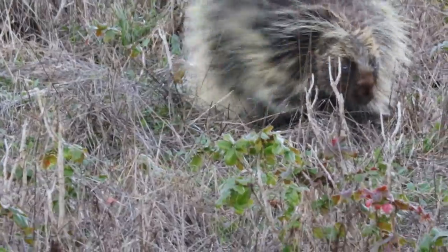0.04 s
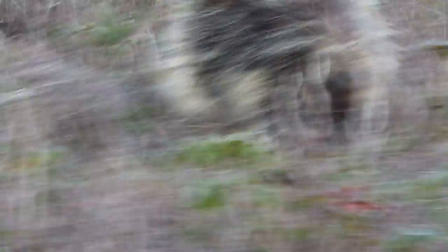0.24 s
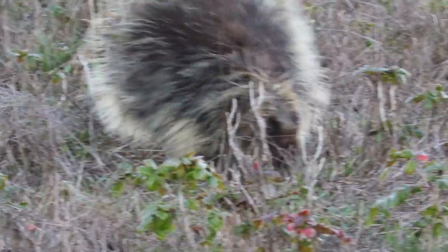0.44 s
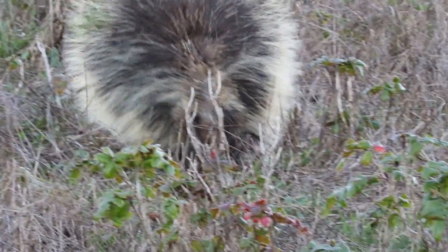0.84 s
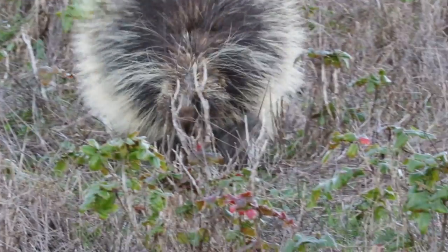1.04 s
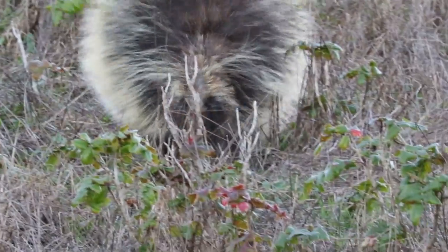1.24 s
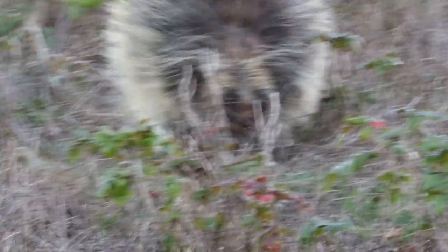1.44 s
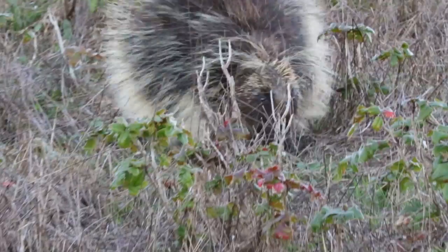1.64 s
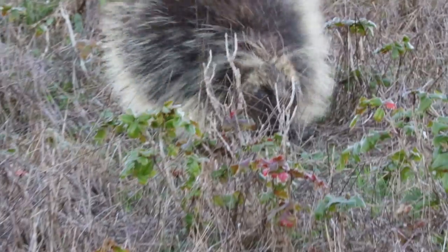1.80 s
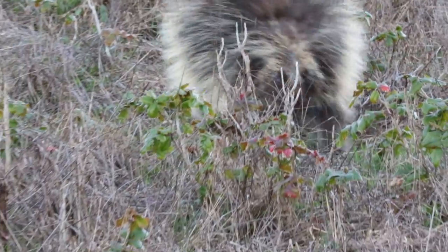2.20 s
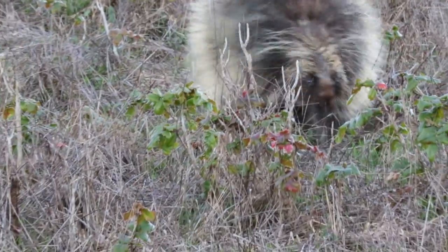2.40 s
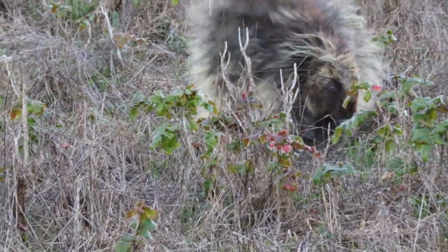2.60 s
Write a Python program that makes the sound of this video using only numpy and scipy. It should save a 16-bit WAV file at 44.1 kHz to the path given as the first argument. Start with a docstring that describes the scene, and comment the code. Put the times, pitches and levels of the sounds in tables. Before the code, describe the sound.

Dry clicks and a knock from a handled camera, over faint low wind.

```python
"""A dry meadow, heard through the body of a hand-held camera.
Faint low wind and a thin hiss make the bed, where a soft midrange rustle swells twice.
The grip shifts: fingers slide and scuff with a stick-slip grain, the shell creaks, and a double
knock rings the housing. Then a small control clicks in two uneven runs, its catch ticking over
each tooth and thudding into its seat."""
import sys
import numpy as np
from scipy import signal
from scipy.fft import rfft, irfft
from scipy.io import wavfile

SR = 44100
rng = np.random.default_rng(int(sys.argv[2]) if len(sys.argv) > 2 else 0)


def dump_mix(stems):
    """Bounce the given channels to the path in sys.argv[1] as a 16-bit WAV at rate SR."""
    frames = np.atleast_2d(stems).T  # one column per channel
    limited = np.clip(frames, -1, 1)  # hard clip at full scale
    pcm = np.round(limited * 32767).astype(np.int16)
    wavfile.write(sys.argv[1], SR, pcm)


N = 121275
T = np.arange(N) / SR

# tone of the wind and of the hiss: f/Hz, relative level/dB
WIND_COLOUR = [(15, -59), (25, -33), (49, -11.5), (106, 0), (151, -0.5), (252, -10.5), (391, -8.5),
               (445, -10.5), (596, -11), (678, -17), (961, -17.5), (1110, -23), (1460, -24.5),
               (1630, -27.5), (2000, -33), (2600, -69), (4400, -120)]
HISS_COLOUR = [(1180, -34), (2000, -5.5), (2510, 1), (4010, -12), (4300, -10.5), (5070, -13), (6140, -11.5),
               (10400, -12.5), (16000, -19.5)]
# slow fader rides on the wind and the hiss: t/s, level offset/dB
WIND_RIDE = [(0, 0.5), (.55, 0.5), (1.15, 1.5), (1.6, -1), (2.0, 0), (2.75, 0.5)]
HISS_RIDE = [(0, 0.5), (.5, 0), (1.3, 0), (1.65, -0.5), (2.1, 1), (2.75, -0.5)]

# brief scuffs of the grip, plus two slow swells of soft midrange background rustle (0.42 s, 2.0 s):
# t/s, level/dB, attack/s, decay/s, centre f/Hz
SCUFFS_AND_RUSTLE = [(.13, -58, 0.0085, .02, 3330), (.42, -55, 0.23, 0.098, 830),
                     (.53, -45, 0.011, 0.021, 2250), (.535, -58.5, 0.0072, 0.019, 4150),
                     (.616, -51, .006, 0.01, 2400), (.648, -43.5, 0.0069, 0.02, 1300),
                     (.722, -44, 0.0067, 0.0094, 1370), (1.06, -60, 0.0067, 0.022, 4130),
                     (1.255, -55.5, 0.0049, 0.011, 3500), (1.27, -61, 0.013, .04, 10000),
                     (1.394, -60, .02, 0.024, 7500), (2.0, -61.5, 0.095, 0.057, 1800)]
# fingers sliding on the housing: t/s, level/dB, attack/s, decay/s, centre f/Hz
FINGER_SLIDES = [(0.047, -45.5, 0.012, 0.0085, 12800), (.078, -51.5, 0.011, 0.023, 9500),
                 (.244, -48, 0.0055, 0.0052, 8500), (.257, -44.5, 0.0083, 0.017, 12200),
                 (.265, -47, 0.034, 0.057, 7400), (.33, -60, 0.024, 0.062, 8740),
                 (.385, -54, 0.053, 0.024, 8740)]
# tone of the broad rub under each slide: f/Hz, relative level/dB
RUB_COLOUR = [(1000, -7), (2500, 0.5), (4500, -5), (7500, -3), (14000, -12)]
# tiny creaks of the shell: t/s, level/dB, centre f/Hz
SHELL_CREAKS = [(0.2177, -35.5, 4500), (0.5197, -48, 4180), (.5285, -42.5, 3000), (.629, -52, 4770),
                (0.712, -38.5, 2400), (0.729, -59, 3000), (.753, -41.5, 2930), (0.774, -47, 3300)]

# the catch passing its teeth: t/s, relative tick level/dB, drop level before expansion/dB
CATCH_CLICKS = [(0.6717, -35.5, -36.5), (0.7955, -36, -60), (0.8319, -39, -41.5), (0.8412, -38, -42.5),
                (0.912, -36, -39), (0.9419, -35.5, -44), (0.9567, -41, -44), (0.9944, -35, -57),
                (1.0236, -36, -44), (1.0731, -33.5, -35), (1.1027, -38, -41.5), (1.1522, -38.5, -40.5),
                (1.1593, -35, -42), (1.2326, -36.5, -39.5), (1.2453, -36.5, -56), (1.2539, -37, -46),
                (2.1127, -34, -34), (2.177, -38, -46), (2.1922, -33.5, -38), (2.2383, -34, -50),
                (2.3128, -34.5, -34), (2.3501, -37.5, -51), (2.3923, -40.5, -43), (2.4314, -37, -59),
                (2.4717, -35, -34.5)]
# tone of the catch's tick and of its settling rattle: f/Hz, relative level/dB
TICK_COLOUR = [(600, -10), (1800, 2.5), (2800, 1.5), (4000, -1.5), (4900, -11.5), (6000, -1), (7800, 5),
               (9500, -4), (11500, -1), (15500, -14)]
RATTLE_COLOUR = [(600, 11), (1100, -9), (2000, -7), (3000, -3.5), (4500, -14.5), (8000, -14)]
# resonances of the control's seat: f/Hz, level/dB, t60/s
SEAT_MODES = [(533, 0.5, 0.031), (783, 7, 0.02), (1013, 2.5, 0.035), (1290, -5.5, 0.024), (1800, -18, 0.06),
              (2670, -10, 0.06)]

# contacts that make up the double knock: t/s, force level/dB, low-pass f/Hz
KNOCK_CONTACTS = [(.2288, -13.5, 6000), (0.2319, -22, 3200), (.2470, -16.5, 3380), (0.261, -31, 2200)]
# resonances of the housing: f/Hz, level/dB, t60/s
HOUSING_MODES = [(181, -19.5, 0.2), (350, -13, 0.044), (571, -19, 0.069), (780, -9.5, 0.042),
                 (925, -10.5, 0.043), (1300, -17, 0.052), (1554, -15.5, 0.034), (1850, -3.5, 0.022),
                 (2400, -9.5, 0.033), (2760, -5, 0.019), (3200, -7, 0.019), (3470, -6, 0.0067),
                 (4360, -10.5, 0.014)]
# tone of the crack on each contact: f/Hz, relative level/dB
CRACK_COLOUR = [(1000, 17), (4000, -7.5), (7500, -7), (11000, -12), (15000, -29)]


def from_db(db):
    """Decibels to gain."""
    return 10 ** (np.asarray(db) / 20)


def unit_rms(x):
    """Scale to unit rms."""
    return x / np.sqrt(np.mean(x ** 2) + 1e-20)


def butter(x, order, hz, kind="low"):
    """Butterworth filter, low-pass by default."""
    return signal.sosfilt(signal.butter(order, hz, kind, fs=SR, output="sos"), x)


def noise(colour):
    """Unit-rms noise of the given colour, rolling off 24 dB an octave beyond its ends."""
    hz, db = np.transpose(colour)
    f = np.maximum(np.arange(N // 2 + 1) * SR / N, 1)
    skirts = np.minimum(f / hz[0], 1) ** 4 * np.minimum(hz[-1] / f, 1) ** 4
    eq = from_db(np.interp(np.log(f), np.log(hz), db))
    return unit_rms(irfft(rfft(rng.standard_normal(N)) * skirts * eq, N))


def swell(s, attack, decay):
    """Envelope that rises smoothly to 1 at time s and dies exponentially; all in seconds."""
    return np.exp(-(np.minimum(T - s, 0) / attack) ** 2 - np.maximum(T - s, 0) / decay)


def impulse(s, db):
    """One sharp push at time s."""
    return from_db(db) * (np.arange(N) == int(s * SR))


def ring(force, modes):
    """A force sets each mode ringing as a dying sine; polarities alternate."""
    out = np.zeros(N)
    for k, (hz, db, t60) in enumerate(modes):
        radius, angle = from_db(-60 / (t60 * SR)), 2 * np.pi * hz / SR
        feedback = [1, -2 * radius * np.cos(angle), radius ** 2]
        out += (-1) ** k * from_db(db) * signal.lfilter([0, np.sin(angle)], feedback, force + 1e-18)
    return out


def band_swells(cues, width):
    """Swells of noise, each in its own band; width is a share of the centre frequency."""
    out = np.zeros(N)
    spread = 1 + width / 2
    for s, db, attack, decay, hz in cues:
        band = butter(rng.standard_normal(N), 2, [hz / spread, hz * spread], "band")
        out += from_db(db) * swell(s, attack, decay) * unit_rms(band)
    return out


def meadow_air():
    """The bed: low wind in slight gusts under a thin, nearly steady hiss."""
    gust_db = noise([(1, 0), (2.74, 0)])   # 1 dB rms of wobble, about 1 to 3 times a second
    wind_db = -43.5 + np.interp(T, *np.transpose(WIND_RIDE)) + gust_db
    hiss_db = -59.5 + np.interp(T, *np.transpose(HISS_RIDE))
    return from_db(wind_db) * noise(WIND_COLOUR) + from_db(hiss_db) * noise(HISS_COLOUR)


def grip_and_rustle():
    """Fingers slide, scuff and make the shell creak; a soft midrange rustle swells behind them."""
    rub_envelope = sum(from_db(db - 3.5) * swell(s, attack, decay)
                       for s, db, attack, decay, _ in FINGER_SLIDES)
    slides = rub_envelope * noise(RUB_COLOUR) + band_swells(FINGER_SLIDES, width=0.57)
    scuffs_and_rustle = band_swells(SCUFFS_AND_RUSTLE, width=0.49)
    grain_db = 2.0 * noise([(24.6, 0), (246, 0)])   # stick-slip of skin; the rustle shares this flutter
    creak_attack_s, creak_decay_s = 0.00059, 0.0013
    creaks = [(s, db, creak_attack_s, creak_decay_s, hz) for s, db, hz in SHELL_CREAKS]
    return from_db(grain_db) * (slides + scuffs_and_rustle) + band_swells(creaks, width=0.8)


def control_clicks():
    """The catch scrapes over a tooth with a bright tick, thuds into its seat and rattles to rest."""
    attack_s, tick_lag_s, drop_lag_s = 0.00068, 0.0014, 0.002347
    tick_envelope = sum(from_db(db - 3.5) * swell(s + tick_lag_s, attack_s, decay=0.0014)
                        for s, db, _ in CATCH_CLICKS)
    pivot_db, expansion = -19, 1.26   # pushes the soft drops further down
    drops = [(s + drop_lag_s, pivot_db + expansion * (db - pivot_db)) for s, _, db in CATCH_CLICKS]
    thuds = ring(sum(impulse(s, db + 1.5) for s, db in drops), SEAT_MODES)
    rattle_envelope = sum(from_db(db - 6.5) * swell(s, attack_s, decay=0.0081) for s, db in drops)
    return tick_envelope * noise(TICK_COLOUR) + thuds + rattle_envelope * noise(RATTLE_COLOUR)


def housing_knocks():
    """Hard and soft contacts ring the housing, each with a midrange punch and a short crack."""
    force = sum(butter(impulse(s, db) + 1e-18, 2, hz) for s, db, hz in KNOCK_CONTACTS)
    # the punch is the contact itself, ahead of the ringing
    punch_low_hz, punch_high_hz, punch_gain_db = 696, 4060, 24
    punch = butter(force, 1, punch_low_hz, "high")
    punch = signal.sosfilt(signal.cheby1(4, 2, punch_high_hz, fs=SR, output="sos"), punch)
    strongest_db = max(db for _, db, _ in KNOCK_CONTACTS)
    crack_envelope = sum(from_db(db - strongest_db - 21) * swell(s, attack=0.00035, decay=0.003)
                         for s, db, _ in KNOCK_CONTACTS)
    crack = crack_envelope * noise(CRACK_COLOUR)
    return from_db(punch_gain_db) * punch + ring(force, HOUSING_MODES) + crack


def scene():
    """Mono mix: handling sounds arrive close and dry through the body, over the meadow bed."""
    return (housing_knocks() + control_clicks() + grip_and_rustle() + meadow_air())[None]


def record(dry):
    """A steep high cut takes off the very top."""
    cutoff_hz = 15800
    return signal.sosfilt(signal.ellip(10, .1, 70, cutoff_hz, fs=SR, output="sos"), dry)


dry = scene()
out = record(dry)
dump_mix(out)
```